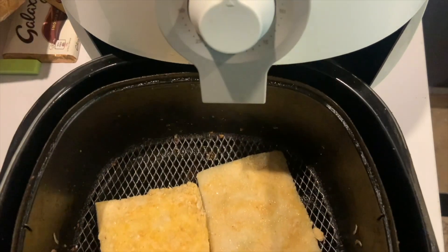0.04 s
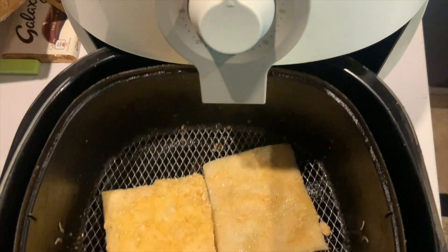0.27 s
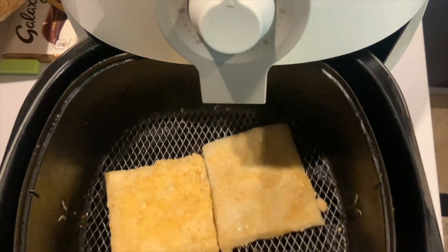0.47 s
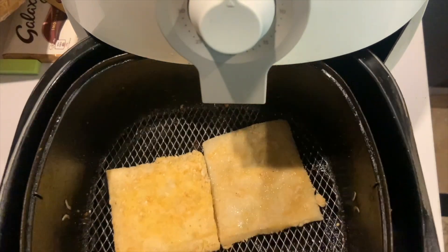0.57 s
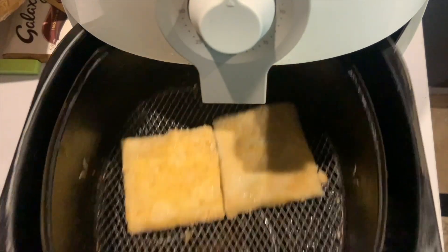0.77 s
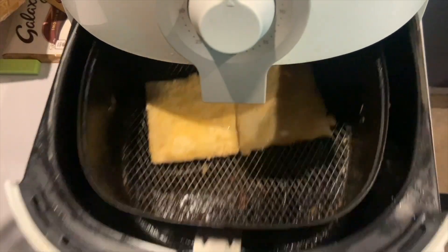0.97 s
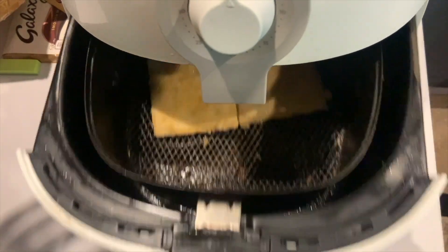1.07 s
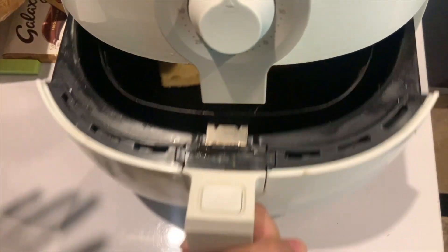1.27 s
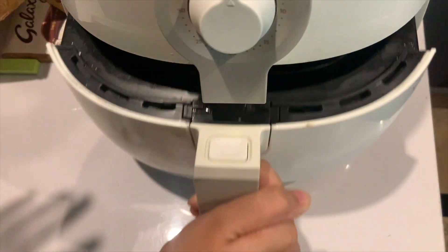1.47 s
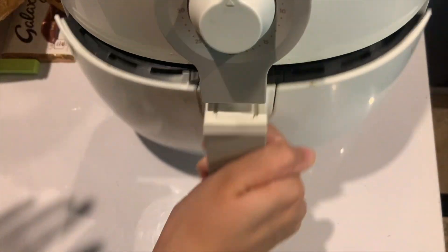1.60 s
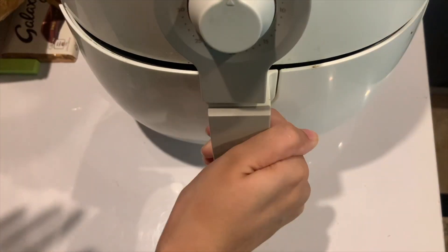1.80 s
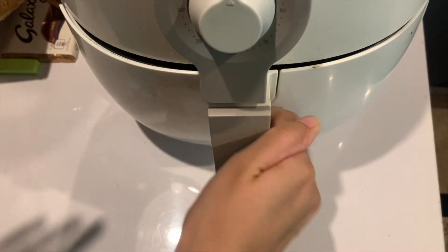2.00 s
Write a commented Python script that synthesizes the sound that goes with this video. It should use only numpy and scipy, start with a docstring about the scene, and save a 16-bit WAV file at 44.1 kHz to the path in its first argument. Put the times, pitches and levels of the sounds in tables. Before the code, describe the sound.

An air fryer basket is pushed in, its metal pan scraping, knocking and faintly ringing along the rails. The scrape softens, then the latch snaps shut with a plastic thud, close by in a small kitchen with a low hum.

```python
"""An air fryer basket is pushed home on a kitchen counter, close to a phone.
The metal pan scrapes along its rails, ticking, knocking and ringing; its wire mesh sings.
The hiss fades, then the latch snaps, the plastic housing thuds and a hand brushes the handle.
A small room hums and reverberates; two microphone ports pick it up in stereo."""
import sys
import numpy as np
from scipy import signal
from scipy.fft import rfft, irfft
from scipy.io import wavfile
from scipy.ndimage import uniform_filter1d

SR = 44100
rng = np.random.default_rng(int(sys.argv[2]) if len(sys.argv) > 2 else 0)


def inscribe(sig):
    """Save sig as 16-bit PCM at rate SR to the path in sys.argv[1].

    A 1-D sig is mono; a 2-D sig holds one channel per row.
    Samples are clipped to [-1, 1] before scaling.
    """
    pcm = np.round(np.clip(np.atleast_2d(sig).T, -1, 1) * 32767)
    wavfile.write(sys.argv[1], SR, pcm.astype(np.int16))


N = 90404
T = np.arange(N) / SR
HIT_T = T[:SR // 2]
RING_ATTACK_S, CLACK_ATTACK_S, TICK_ATTACK_S = 0.0047, 0.00075, 0.0009

# Latch and rail-edge modes: freq_hz, level_db, t60_s
EDGE_MODES = [(3250, 0.5, 0.0268), (3944, -0.5, 0.019), (6150, -2.5, 0.02), (6466, -3, 0.069),
              (10500, -9.5, 0.016), (10260, -4.5, 0.054), (10400, -5.5, 0.026), (14780, -5, 0.036)]
# Pan contact spectrum: freq_hz, density_db
CLACK_SPECTRUM = [(250, -12.5), (480, 11), (620, -6), (820, 3), (1150, -13.5), (1550, -4), (2100, -14),
                  (2700, -16.5), (4000, -11), (8000, -50.5)]


def undb(db):
    """Decibels to gain."""
    return 10 ** (np.asarray(db) / 20)


def on_bins(curve, size):
    """Interpolate (freq_hz, value) rows onto FFT bins over log frequency."""
    hz, values = np.array(curve, float).T
    return np.interp(np.log(np.fft.rfftfreq(size, 1 / SR) + 1), np.log(hz), values)


def colour(x, spectrum):
    """Filter by a spectrum; scale to unit RMS."""
    y = irfft(rfft(x) * undb(on_bins(spectrum, len(x))), len(x))
    return y / y.std()


def unit(x):
    """Scale the loudest 3 ms to unit RMS."""
    return x / np.sqrt(uniform_filter1d(x * x, 130).max())


def decay(attack_s, t60_s):
    """Quick rise, exponential fall."""
    return (1 - np.exp(-(HIT_T / attack_s) ** 2)) * np.exp(-np.log(1000) * HIT_T / t60_s)


def ring(modes, attack_s, scatter_db=3, detune=0.012):
    """Struck modes; random balance stands for the point of contact."""
    out = 0
    for hz, db, t60_s in modes:
        level_draw, pitch_draw, phase = rng.standard_normal(3)
        sine = np.sin(2 * np.pi * (hz * (1 + detune * pitch_draw) * HIT_T + phase))
        out += undb(db + scatter_db * level_draw) * decay(attack_s, t60_s) * sine
    return unit(out)


def burst(spectrum, attack_s, t60_s):
    """Dense, short-lived contact modes as decaying noise."""
    return unit(colour(rng.standard_normal(len(HIT_T)), spectrum) * decay(attack_s, t60_s))


def add(out, start_s, sound):
    """Mix a sound in at start_s."""
    i = int(start_s * SR)
    out[i:i + len(sound)] += sound[:N - i]


def friction(spectrum, uneven_db, cluster_hz=70, grit=0.2, slips_per_s=1600):
    """Tiny slips over a smooth rub, in uneven clusters; grit is the slips' share of power."""
    slips = (rng.random(N) < slips_per_s / SR) * rng.standard_normal(N)
    slips *= undb(3 * np.minimum(rng.exponential(size=N), np.pi))
    clusters = np.interp(T * cluster_hz, np.arange(1024), rng.standard_normal(1024))
    force = np.sqrt(grit) * slips / slips.std() + np.sqrt(1 - grit) * rng.standard_normal(N)
    return colour(force, spectrum) * undb(uneven_db * clusters)


def rail_slide():
    """The pan hisses, grinds and rumbles on its rails, catching at first, smoother later."""
    # Friction levels: time_s, hiss_db, grind_db, rumble_db
    levels = [(0, -76, -59, -51), (.19, -75, -67.5, -59), (.25, -56, -58, -39), (.30, -51.5, -40, -34.5),
              (.40, -56, -61, -39), (.46, -57, -51.5, -50), (.51, -49, -47, -36.5),
              (.55, -55.5, -43.5, -47.5), (.62, -55.5, -53, -44.5), (0.686, -47, -46.5, -45),
              (0.74, -44.5, -30, -33.5), (0.792, -34.5, -42, -32), (.82, -47, -48, -45.5),
              (.875, -37, -33.5, -33.5), (0.914, -34.5, -36.5, -27), (.946, -45, -41, -38),
              (.979, -41, -40, -38), (1.07, -46.5, -47, -44.5), (1.171, -47, -47, -50.5),
              (1.35, -51.5, -54, -63), (1.47, -51, -62.5, -66.5), (1.59, -47, -49, -33.5),
              (1.67, -66.5, -62, -55), (1.75, -100, -76.5, -62)]
    # Hiss texture: time_s, uneven_db, grit_share, edge_ring_db
    texture = [(.55, 2, 0.75, -6), (.9, 0.5, 0.5, -15), (1.02, 0.5, 0.12, -39)]
    # Friction spectra: freq_hz, density_db
    hiss_spectrum = [(900, -9), (2000, 3.5), (2700, 1.5), (4000, 4), (5500, 0), (8000, 0.5), (11000, -1.5),
                     (13500, -2), (15500, 0.5)]
    grind_spectrum = [(250, -21), (460, 4), (630, -3), (900, 1), (1120, 0), (1350, -5.5), (1900, -5.5),
                      (2700, -18.5), (5000, -34.5)]
    rumble_spectrum = [(25, -32.5), (55, -21), (100, 0.5), (160, -10), (210, -5.5), (320, -6), (600, -23),
                       (1200, -49)]
    time_s, *columns = np.array(levels).T
    hiss_db, grind_db, rumble_db = (np.interp(T, time_s, column) for column in columns)
    time_s, *columns = np.array(texture).T
    uneven_db, grit, edge_db = (np.interp(T, time_s, column) for column in columns)
    hiss = friction(hiss_spectrum, uneven_db, cluster_hz=480, grit=grit)
    edge = ring(EDGE_MODES, TICK_ATTACK_S)
    hiss += undb(edge_db) * signal.fftconvolve(hiss, edge / np.linalg.norm(edge))[:N]
    grind = friction(grind_spectrum, uneven_db=2)
    rumble = friction(rumble_spectrum, uneven_db=3.5)
    return undb(hiss_db) * hiss + undb(grind_db) * grind + undb(rumble_db) * rumble


def edge_ticks():
    """Hard edges catch and let go; the pan's rim clinks."""
    # Catches: start_s, level_db, t60_s, rim_db, tilt_db_per_octave
    ticks = [(0.1879, -41, 0.061, -38, -6.5), (.221, -49, .04, -54, -1), (0.2247, -48, 0.064, -54, -4),
             (0.237, -45, 0.069, -50, -3), (0.248, -48, 0.038, -57, 0), (0.2664, -43, 0.066, -48, 0),
             (0.2726, -38.5, 0.076, -28, -5), (.292, -46, 0.054, -31.5, -4), (0.3244, -43.5, 0.05, -55, 1),
             (0.328, -39, 0.076, -34, -4), (0.342, -45, 0.045, -59, -2), (.373, -22.5, 0.043, -34, 0.5),
             (0.377, -27, 0.015, -37, -8), (.423, -38, 0.083, -55, 2.5), (.474, -48.5, 0.04, -65, 4),
             (0.4865, -43.5, .05, -50, 8), (.506, -42.5, .08, -56, 6), (0.581, -40, 0.15, -32, -7.5),
             (0.703, -30, 0.11, -39, -3.5), (0.717, -33.5, .025, -41, -10), (0.7505, -33.5, 0.065, -58, 0),
             (0.7539, -32.5, 0.14, -63, 1.5), (0.775, -44, 0.099, -50, 0), (0.853, -40, 0.031, -50, -6),
             (0.8807, -33, 0.081, -58, 12), (.894, -42, 0.076, -35, 10), (.905, -49, 0.032, -33, 10),
             (0.972, -37.5, .06, -59, 17), (1.086, -47, 0.042, -34, 2), (1.4287, -38, 0.0045, -56, 1)]
    # Edge contact spectrum: freq_hz, density_db
    crack_spectrum = [(700, -21.5), (1600, -5.5), (2700, -19), (3900, 4), (5200, -3), (6400, -7),
                      (8000, -3.5), (10500, -5), (13000, -3), (15500, -9)]
    # Pan rim modes: freq_hz, level_db, t60_s
    rim_modes = [(1243, -4, 0.075), (1313, 11.5, 0.014), (1535, -0.5, 0.057), (2088, 0.5, 0.042),
                 (2256, -4, 0.029), (4010, -5, 0.039)]
    pivot_hz = 7000
    out = np.zeros(N)
    for start_s, db, t60_s, rim_db, tilt in ticks:
        spectrum = [(hz, level + tilt * np.log2(hz / pivot_hz)) for hz, level in crack_spectrum]
        crack = burst(spectrum, TICK_ATTACK_S, t60_s) + undb(-9.5) * ring(EDGE_MODES, TICK_ATTACK_S)
        add(out, start_s, undb(db) * crack + undb(rim_db) * ring(rim_modes, CLACK_ATTACK_S))
    return out


def pan_knocks():
    """Each knock rings the pan's floor, clacks its walls and shakes the housing."""
    # Pan impacts: start_s, floor_db, pitch_hz, clack_db, cutoff_hz, thud_db
    knocks = [(0.189, -30, 416.3, -40, 3500, -34), (0.197, -18.5, 398.6, -53, 1010, -53),
              (.227, -27, 383.4, -46.5, 1000, -31.5), (.252, -31, 400, -50, 1000, -56),
              (0.272, -26, 462, -33.5, 4000, -44), (.281, -24, 446.6, -39, 2000, -46),
              (0.292, -31, 420, -54, 4000, -30), (0.327, -41, 456, -42, 3000, -36),
              (.337, -26, 415.7, -35, 1500, -28), (0.374, -32, 454, -42, 3000, -31.5),
              (.387, -32.5, 429.6, -31, 1500, -36), (0.424, -40, 456, -37.5, 2000, -35.5),
              (0.488, -36, 457.5, -38.5, 1400, -48.5), (0.522, -31.5, 467, -40, 2000, -40),
              (0.5331, -31, 445, -33, 3000, -55), (0.561, -34, 488, -35, 1090, -47),
              (.584, -17.5, 442.4, -32, 4000, -30.5), (0.606, -32, 469.7, -37, 3000, -30),
              (.643, -39, 460, -36, 1300, -36.5), (0.7029, -21.5, 462, -19, 1500, -30.5),
              (.721, -18, 472.5, -21, 4040, -24), (0.728, -15.5, 458.9, -25, 4000, -28),
              (0.736, -26, 459, -33, 3000, -29), (0.756, -18.5, 450.3, -22.5, 2500, -29),
              (0.784, -30, 453, -34.5, 2950, -31), (0.795, -46, 435, -37, 3000, -28.5),
              (0.822, -25.5, 418.7, -31, 900, -26.5), (0.8518, -20, 452, -17, 940, -27),
              (.8565, -31, 435, -21.5, 1090, -39), (0.8991, -24, 465, -18, 1760, -24.5),
              (0.915, -26, 435, -27, 3500, -28.5), (0.952, -52, 447, -36.5, 3030, -40),
              (0.984, -57, 466, -41, 2000, -42), (1.084, -34, 540, -24, 2600, -34),
              (1.16, -57.5, 472, -37.5, 1200, -51)]
    # Pan wall and housing modes: freq_hz, level_db, t60_s
    wall_modes = [(566, -14, 0.048), (654, -12, 0.018), (766, -7.5, 0.057), (793, -4.5, 0.057),
                  (850.3, -4, 0.053), (878.5, -3.5, .04), (945, -5, 0.054), (1200, -25, 0.025),
                  (1479, -12, 0.11), (1617, -16, 0.066), (1907, -13, 0.1), (2120, -28, .08),
                  (2356, -18.5, 0.15), (2887, -19.5, 0.084), (3360, -25, 0.14), (4295, -18, .12)]
    housing_modes = [(96.6, -1.5, 0.11), (136.3, -2, 0.1), (200, -3.5, 0.17), (260.4, -3, 0.084),
                     (304.6, -1, 0.13)]
    grip_s, free_t60_s, gripped_t60_s = 0.265, 0.15, 0.067  # the rails grip and damp the pan
    out = np.zeros(N)
    for start_s, floor_db, pitch_hz, clack_db, cutoff_hz, thud_db in knocks:
        phase = 2 * np.pi * pitch_hz * (start_s + HIT_T)
        mode_pair = np.sin(phase) + undb(-23) * np.sin(1.2 * phase)
        t60_s = free_t60_s if start_s < grip_s else gripped_t60_s
        floor = unit(decay(RING_ATTACK_S, t60_s) * mode_pair)
        walls = undb(-1) * ring(wall_modes, CLACK_ATTACK_S)
        contact = undb(-5) * burst(CLACK_SPECTRUM, CLACK_ATTACK_S, t60_s=0.049)
        clack = unit(signal.lfilter(*signal.butter(2, cutoff_hz, fs=SR), walls + contact))
        thud = ring(housing_modes, attack_s=0.0045)
        add(out, start_s, undb(floor_db) * floor + undb(clack_db) * clack + undb(thud_db) * thud)
    return out


def wire_mesh(pitch_hz=1095):
    """The jolted mesh sings on one thin note."""
    # Jolts: start_s, level_db
    jolts = [(0.396, -40.5), (.587, -40.5), (.73, -34.5), (0.921, -41.5)]
    note = unit(decay(RING_ATTACK_S, t60_s=0.35) * np.sin(2 * np.pi * pitch_hz * HIT_T))
    out = np.zeros(N)
    for start_s, db in jolts:
        add(out, start_s, undb(db) * note)
    return out


def rim_drag():
    """The basket's rim drags on the housing as it shuts."""
    # Drag spectrum: freq_hz, density_db
    spectrum = [(100, -20), (190, 0.5), (260, -3), (350, -9), (500, -25), (1200, -45.5)]
    # Drag envelope: time_s, level_db
    levels = [(1.485, -73), (1.502, -38), (1.53, -52.5), (1.56, -35), (1.59, -67)]
    level_db = np.interp(T, *np.array(levels).T, left=-np.inf, right=-np.inf)
    return undb(level_db) * friction(spectrum, uneven_db=1.1)


def latch_shut():
    """The latch snaps twice as the basket bumps home against the housing."""
    # Latch snaps: start_s, level_db, t60_s
    snaps = [(1.5517, -21, .035), (1.5541, -19, 0.0091)]
    # Snap spectrum: freq_hz, density_db
    snap_spectrum = [(700, -4.5), (1600, 6.5), (2600, -18.5), (3200, 9), (4200, -20.5), (5100, 10.5),
                     (6200, -1.5), (7500, -1), (8800, 1.5), (10400, 13), (12400, -7), (13500, -1),
                     (14800, 4.5), (16000, -1)]
    # Seating bumps: start_s, thud_db, knock_db
    bumps = [(1.538, -43, -43), (1.557, -25, -25.5), (1.565, -26, -42.5), (1.582, -38, -50)]
    # Closed housing modes: freq_hz, level_db, t60_s
    shut_modes = [(133.4, 4.5, 0.17), (188.7, -2, .14), (228, 0.5, .13), (303.7, -5, .15),
                  (368, -3.5, 0.097), (491, -10.5, 0.061), (587, -6.5, 0.064), (730, -5.5, 0.074),
                  (1575, -9.5, .08), (2170, -16.5, 0.069)]
    out = np.zeros(N)
    for start_s, db, t60_s in snaps:
        snap = burst(snap_spectrum, attack_s=0.0001, t60_s=t60_s)
        latch_ring = undb(-15) * ring(EDGE_MODES, attack_s=0.00044)
        add(out, start_s, undb(db) * (snap + latch_ring))
    for start_s, thud_db, knock_db in bumps:
        thud = ring(shut_modes, attack_s=0.0024)
        knock = burst(CLACK_SPECTRUM, attack_s=0.00054, t60_s=0.033)
        add(out, start_s, undb(thud_db) * thud + undb(knock_db) * knock)
    return out


def hand_brush(peak_s=1.872, width_s=0.025, level_db=-59.5):
    """Skin brushes the plastic handle once."""
    # Brush spectrum: freq_hz, density_db
    spectrum = [(250, -3), (800, 0.5), (2000, -5), (4000, -14), (15000, -24.5)]
    swell = np.exp(-((T - peak_s) / width_s) ** 2)
    return undb(level_db) * swell * colour(rng.standard_normal(N), spectrum)


def room_tone(level_db=-48.5):
    """Steady noise with a low hum."""
    # Room spectrum: freq_hz, density_db
    spectrum = [(20, -45), (30, -31.5), (42, -17), (58, 7), (80, -5), (118, -2.5), (170, -10), (260, -15),
                (460, -27.5), (750, -30), (1100, -34.5), (1800, -37.5), (3200, -42.5), (5000, -50.5),
                (16000, -57.5)]
    return undb(level_db) * colour(rng.standard_normal(N), spectrum)


def kitchen_reverb(x):
    """Diffuse reflections from counter and walls, shortest in the top treble."""
    # Reverb bands: freq_hz, t60_s, level_db
    bands = [(100, 0.86, -11), (400, 0.24, -12.5), (1500, 0.56, -18), (4800, .26, -19.5),
             (14000, 0.073, -23.5)]
    size = len(HIT_T)
    noise = rfft(rng.standard_normal(size))
    tail = 0
    for hz, t60_s, db in bands:
        band = on_bins([(row[0], row[0] == hz) for row in bands], size)
        fall = decay(0.003, t60_s)
        tail += undb(db) * irfft(noise * band, size) * fall / np.linalg.norm(fall)
    return signal.fftconvolve(x, tail)[:N]


def scene():
    """Fryer and room reach two microphone ports a little apart."""
    # Phase between ports: freq_hz, left_lag_rad
    port_phase = [(30, 0), (250, .25), (600, .8), (900, .25), (1400, .05), (2200, -.8), (3600, -1.4),
                  (4750, -3.14), (6500, -6.28), (8850, -9.42), (11000, -12.5), (13200, -15.7),
                  (15300, -18.8)]
    # Port balance: freq_hz, left_minus_right_db
    port_balance = [(100, 0.2), (250, 0.5), (450, -3), (700, -3), (1100, -2), (2200, -1.5), (4000, -1),
                    (15000, 0.5)]
    # Diffuse sound differing between ports: freq_hz, gain_db
    port_spread = [(100, -36), (400, -3), (1000, 6.5), (3000, -3), (12000, -27)]
    fryer = rail_slide() + edge_ticks() + pan_knocks() + wire_mesh()
    fryer += rim_drag() + latch_shut() + hand_brush()
    mid = rfft(fryer + kitchen_reverb(fryer) + room_tone())
    side = rfft(kitchen_reverb(fryer) + 0.71 * room_tone()) * undb(on_bins(port_spread, N))
    balance = undb(on_bins(port_balance, N) / 2)
    lag = np.exp(-1j * on_bins(port_phase, N))
    return np.array([irfft((mid + side) * balance * lag, N), irfft((mid - side) / balance, N)])


def record(dry):
    """The ends fade; the phone cuts the top treble."""
    fade_s, cutoff_hz = 0.004, 15750
    fade = np.clip(np.minimum(T, T[-1] - T) / fade_s, 0, 1)
    return signal.sosfilt(signal.ellip(8, 0.2, 70, cutoff_hz, fs=SR, output="sos"), dry * fade)


dry = scene()
out = record(dry)
inscribe(out)
```